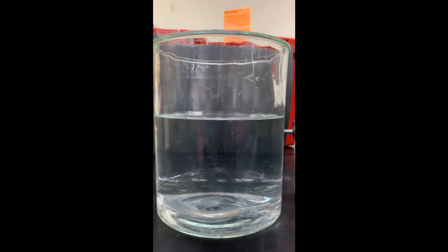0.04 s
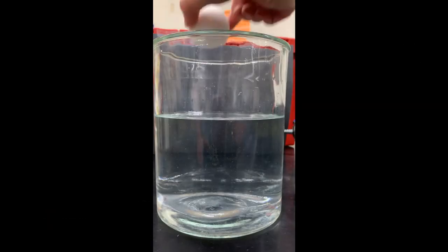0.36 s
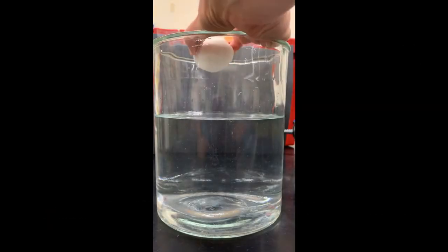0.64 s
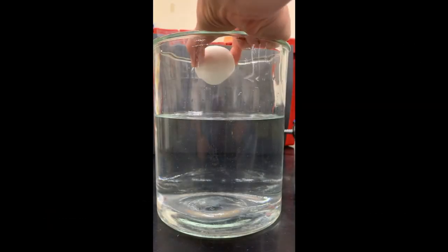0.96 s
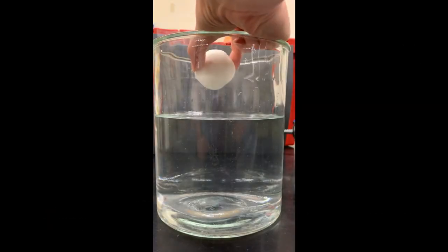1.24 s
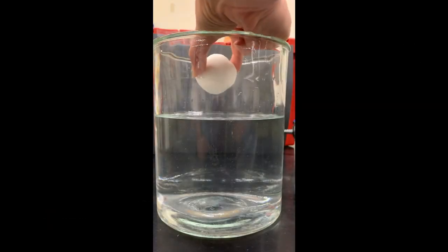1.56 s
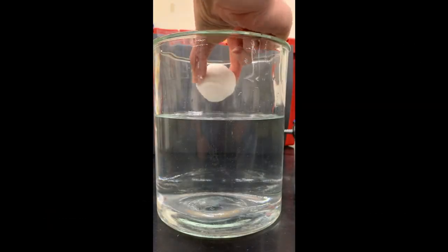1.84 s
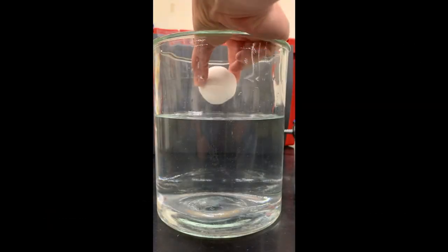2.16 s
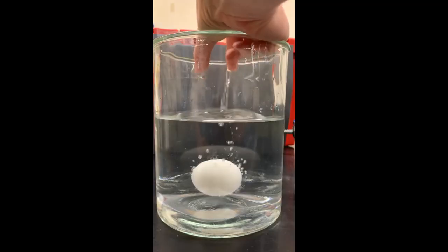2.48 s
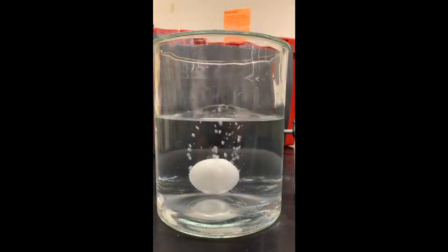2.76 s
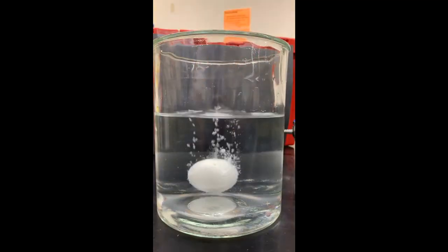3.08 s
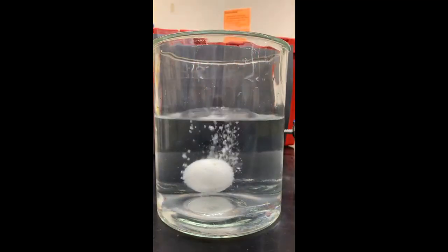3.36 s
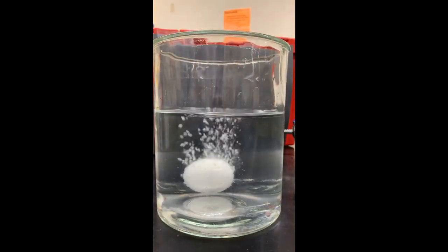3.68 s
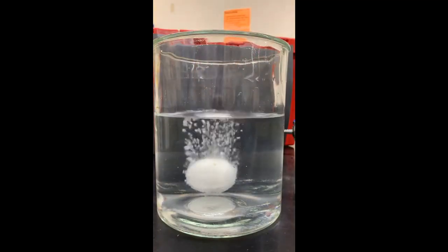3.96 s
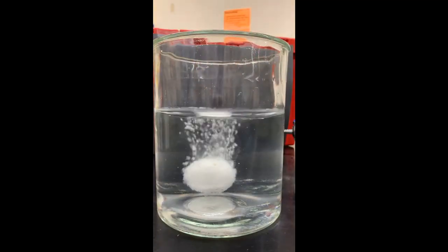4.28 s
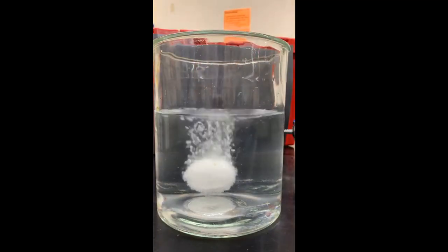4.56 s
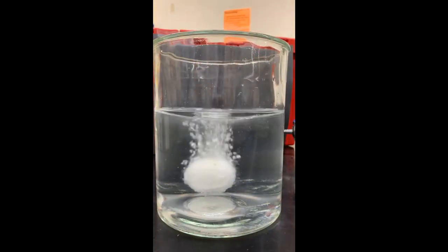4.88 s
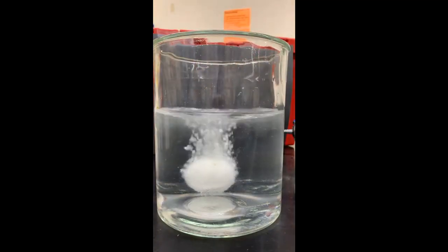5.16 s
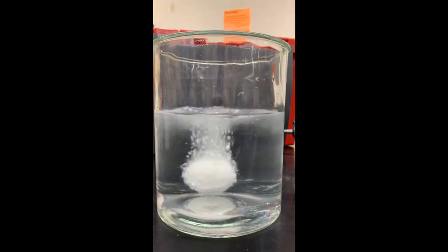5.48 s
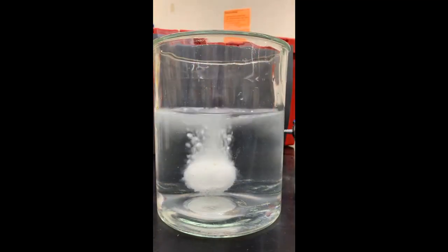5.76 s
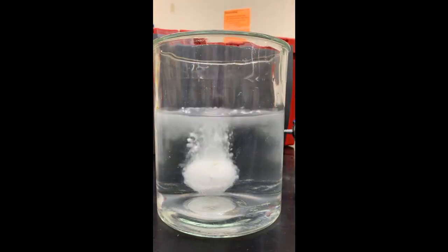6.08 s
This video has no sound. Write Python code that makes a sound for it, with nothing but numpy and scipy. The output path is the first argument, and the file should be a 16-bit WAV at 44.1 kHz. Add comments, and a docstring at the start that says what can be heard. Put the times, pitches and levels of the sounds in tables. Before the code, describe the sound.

A low ventilation hum fills a quiet room throughout. A hand brushes faintly past, with a soft bump on the bench at about 0.6 seconds and a light fingernail tap on glass at 1.6. At 2.4 seconds a small bath bomb drops into a nearby glass jar of water: a short splash and a hollow, plopping knock, the loudest moment, followed by a brief gurgle. Droplets click on the water around 2.6 seconds, and at 3 seconds the ball touches the glass again with a lighter clink. A few small drips and pops follow. From about 3.5 seconds a faint, high fizz builds, with light glass ticks and a tiny hissing spurt of gas near 3.8. The fizz continues, dotted with small snaps and bubble chirps. A soft bump and click come at 5.7 seconds, and a brief hand brush ends it just after 6.

```python
"""A small bath bomb drops into a tall glass jar of water: the impacts excite the normal modes of the
jar, its wall and the surface, and trapped bubbles ring as oscillators of gas and water. The ball touches
the glass once more, then fizzes: tiny gas bubbles burst at the surface, with a louder tick now and then.
Behind it are a hand brushing past, soft bumps on the bench and a quiet room with humming ventilation."""
import sys
import numpy as np
from scipy import signal
from scipy.fft import rfft, irfft
from scipy.io import wavfile

SR = 44100
rng = np.random.default_rng(int(sys.argv[2]) if len(sys.argv) > 2 else 0)


def unload_wav(signal):
    """Save mono or channel-first audio to the path in sys.argv[1] as 16-bit WAV at rate SR, clipped to [-1, 1]."""
    wavfile.write(
        sys.argv[1],
        SR,
        np.round(np.clip(np.atleast_2d(signal).T, -1, 1) * 32767).astype(np.int16),
    )


N = 270333
TIME = np.arange(N) / SR
FREQS = np.maximum(np.fft.rfftfreq(N, 1 / SR), 1)
CUTOFF_HZ = 15900
SIDES = np.array([[1], [-1]])   # sign of a level offset: left, right


# Blows of the ball: (time [s], body level [dB], glass level [dB], contact cut-off [Hz],
# spray level [dB], place [0 middle of the base, 1 near the wall])
BALL_BLOWS = [(2.374, -16, -35, 820, -36, 0), (2.4088, 1, -15.5, 6000, -44.5, 0),
              (2.9827, -18.5, -15.5, 720, -58, 0.97)]
# Modes of the jar with its water and air column: (frequency [Hz], level [dB], T60 [s])
JAR_MODES = [(70, -30, 0.17), (178, -41, 0.08), (333.3, -7, 0.038), (372, -24, 0.3), (450.3, -25.5, 0.19),
             (481.5, -10, 0.067), (664, -6, 0.027), (637, -21, 0.098), (713, -38.5, 0.43),
             (966, -18, 0.046), (1044, -13, 0.064), (1119, -12.5, 0.048), (1257, -31, 0.13),
             (1550, -17.5, 0.019), (1860, -35, 0.086), (2156, -26.5, 0.049), (2190, -50.5, 0.33),
             (2600, -27.5, 0.032)]
def ball(spray_rise_s=0.0057, spray_t60=0.058, body_top_hz=3100):
    """Impact excitation: each blow rings the jar and throws spray; soft contact spares high body modes."""
    body = glass = spray = 0
    hiss = band(rng.standard_normal(N), 1200, "high")
    for s, body_db, glass_db, contact_hz, spray_db, place in BALL_BLOWS:
        for hz, db, t60 in JAR_MODES:
            softening = np.hypot(1, (hz / contact_hz) ** 3)
            body += from_db(body_db + db) / softening * ring(s, hz, t60, rise_cycles=1)
        glass += from_db(glass_db) * glass_wall(s, place)
        spray += from_db(spray_db) * hiss * swell(age(s - spray_rise_s), spray_rise_s, spray_t60)
    return band(body, body_top_hz, "low", order=4) + glass + spray


# Glass modes: (frequency [Hz], level struck mid-base [dB], level struck near the wall [dB], T60 [s])
GLASS_MODES = [(1443, -38, -17, 0.039), (1535, -37, -22.5, 0.016), (2230, -48, -40, 0.096),
               (2345, -37, -24.5, 0.055), (3334, -38, -38, 0.19), (3420, -43, -24, 0.075),
               (4000, -45, -40, 0.049), (5500, -26.5, -61, 0.063), (6580, -39, -42, 0.047),
               (7260, -33, -47, 0.098), (9000, -49, -32, .03), (10150, -38, -43, 0.044),
               (10700, -45, -47, .035), (15300, -46, -48, .025)]
def glass_wall(s, place):
    """Modal superposition: the point of impact sets the strength of each mode of the glass."""
    return sum(from_db((1 - place) * middle_db + place * wall_db) * ring(s, hz, t60, rise_cycles=0.31)
               for hz, middle_db, wall_db, t60 in GLASS_MODES)


# The surface tears, then closes over the ball: (peak time [s], level [dB], 20 dB rise [s], 20 dB fall [s])
SPLASH_SURGES = [(2.379, -30.5, 0.015, 0.037), (2.41, -27.5, 0.014, 0.023)]
# Spectral shaping of the torn water: (frequency [Hz], gain [dB])
SPLASH_SPECTRUM = [(150, 28.5), (500, -0.5), (1100, -4.5), (1800, -9), (3000, -12), (4400, -12),
                   (7000, -10), (8500, -24), (11000, -21.5), (15000, -15)]
def plunge(froth_db=-22, froth_fall_s=0.085):
    """Air entrainment: torn water holds short-lived bubbles of every size, and their froth lingers."""
    swarm = grains(per_s=9000, spread_db=3, low_hz=250, high_hz=15000, t60_cycles=7)
    swarm = rms_one(coloured(band(swarm, 1800, "high", order=1), SPLASH_SPECTRUM))
    splashes = [from_db(db) * (surge(s, rise, fall) + from_db(froth_db) * surge(s, rise, froth_fall_s))
                for s, db, rise, fall in SPLASH_SURGES]
    return np.max(splashes, axis=0) * swarm


# Slaps and drips on the water: (time [s], level [dB], spectral tilt [dB/octave])
SURFACE_HITS = [(2.373, -26.5, 4.5), (2.6039, -31, -11), (2.6472, -29, -5), (3.128, -46.5, -23),
                (3.155, -49, -19), (3.32, -44.5, -13), (3.376, -51, -6)]
# Modes of the jar when the water is struck: (frequency [Hz], level [dB], T60 [s])
SURFACE_MODES = [(1535, 3, 0.022), (2346, -9.5, 0.034), (2700, -15, .015), (4170, 0, 0.01),
                 (5080, -8, 0.015), (6340, -14, 0.02), (8320, -18, 0.01)]
def drips():
    """Impulse response: every slap or drip rings the same modes; a sharper one favours the high ones."""
    lowest_hz = SURFACE_MODES[0][0]
    return sum(from_db(db + mode_db + tilt * np.log2(hz / lowest_hz)) * ring(s, hz, t60, rise_cycles=2)
               for s, db, tilt in SURFACE_HITS for hz, mode_db, t60 in SURFACE_MODES)


# Short ringing tones, bubble notes and low echoes after the knocks:
# (time [s], frequency [Hz], level [dB], T60 [s])
SHORT_TONES = [(2.3357, 4100, -46, 0.017), (2.3755, 623, -29, 0.082), (2.4315, 470, -35, 0.044),
               (2.439, 1060, -24, 0.016), (2.451, 1416, -37.5, 0.32), (2.461, 395, -25.5, 0.055),
               (2.498, 386, -15.5, 0.056), (2.524, 366, -28, .06), (2.6065, 1514, -32, 0.046),
               (2.6504, 1043, -33.5, 0.21), (2.728, 1038, -51, 0.16), (2.984, 548, -43.5, 0.23),
               (3.008, 423, -33, 0.043), (3.035, 354, -35.5, 0.16), (3.04, 552, -40, 0.078),
               (4.835, 1544, -59.5, .12), (5.072, 2110, -57, 0.069)]
def ringing_tones(wobble_db=2.1):
    """Damped resonance: each bubble note or low echo dips to its pitch, wavers and climbs slightly."""
    rings = sum(from_db(db) * ring(s, hz, t60, rise_cycles=1.94, glide=0.0068, sag=0.053)
                for s, hz, db, t60 in SHORT_TONES)
    return rings * from_db(wobble_db * drift(60))


def churn(start_s=2.42, db=-38, t60=0.12):
    """Cavity collapse: the hollow behind the ball breaks up into a short gurgle of bubbles."""
    swarm = grains(per_s=260, spread_db=2, low_hz=400, high_hz=1700, t60_cycles=35,
                   favour=lambda hz: 1 / np.sqrt(hz))
    return from_db(db) * swell(age(start_s), 0.01, t60) * swarm


# Spectral shaping of the cloud of tiny bubbles: (frequency [Hz], gain [dB])
FIZZ_SPECTRUM = [(1600, -22), (2300, 0.5), (3200, 1), (4200, 2), (4850, 8), (5400, -2), (6000, -4),
                 (6400, -2.5), (7300, -8.5), (8400, -8), (9500, -4.5), (11000, -4.5), (15000, -5.5)]
def fizz(wet_s=2.7, trickle_db=-90.5, stream_db=-87, waver_db=-1.5):
    """Shot noise: a cloud of tiny bubbles and separate snaps follow the gas flow, trickle to stream."""
    cloud = grains(per_s=8000, spread_db=2.2, low_hz=1500, high_hz=15500, t60_cycles=9)
    cloud = coloured(band(cloud, 10800, "high", order=1), FIZZ_SPECTRUM)
    cloud = rms_one(band(cloud, 1700, "high"))
    snaps = grains(per_s=30, spread_db=2.8, low_hz=4500, high_hz=15000, t60_cycles=22, favour=np.sqrt)
    flow = from_db(trickle_db) * (TIME > wet_s) + from_db(stream_db) * plume()
    return flow * from_db(waver_db * drift(8.2)) * (from_db(10) * cloud + from_db(1) * snaps)


def plume(arrival_s=3.64, build_s=0.17):
    """Buoyant rise: the share of the gas stream that has reached the surface, 0 to 1."""
    return 0.5 + 0.5 * np.tanh((TIME - arrival_s) / build_s)


# Brief bright ticks of a fingernail tap, the slap on the water, droplets and tiny bursts:
# (time [s], level [dB], lower band edge [Hz], upper band edge [Hz])
BRIGHT_TICKS = [(1.5645, -57, 3600, 12800), (2.262, -59, 6040, 14500), (2.374, -36, 4200, 15000),
                (2.3755, -33, 4200, 10000), (2.6044, -47, 4160, 13000), (2.628, -55, 6500, 13000),
                (2.648, -35.5, 3970, 10700), (2.6972, -42, 5000, 10400), (2.716, -58, 2520, 14600),
                (3.219, -53, 4200, 13800), (3.237, -49, 4260, 14000), (3.356, -49, 3780, 13800),
                (4.369, -64, 7900, 15500), (4.417, -57, 9000, 12000), (4.4365, -55, 12000, 15500),
                (4.4576, -57, 11000, 15000), (4.6112, -55, 8000, 14000), (4.713, -54, 12500, 15250),
                (4.9315, -54, 12100, 15500), (5.042, -60, 11000, 15500), (5.0625, -57, 9000, 11500),
                (5.2305, -54, 12000, 15000), (5.4937, -55, 10000, 15300), (5.584, -56, 5500, 14000),
                (5.824, -54, 9000, 15000), (5.953, -67, 10000, 14500)]
def ticks(gain_db=1, rise_s=0.00099, t60=0.0087):
    """Broadband transients: a brief tap, slap or burst spreads its energy over a wide treble band."""
    out, t = np.zeros(N + SR), TIME[:SR // 20]
    for s, db, low_hz, high_hz in BRIGHT_TICKS:
        crack = rms_one(band(rng.standard_normal(len(t)), [low_hz, high_hz], "band"))
        first = int(s * SR)
        out[first:first + len(t)] += from_db(db + gain_db) * swell(t, rise_s, t60) * crack
    return out[:N]


# Snaps of larger bubbles and of dry fingers: (time [s], level [dB], centre frequency [Hz])
DULL_SNAPS = [(1.562, -45, 2000), (1.724, -59, 4000), (2.114, -51, 2840), (3.219, -46.5, 2800),
              (3.237, -44.5, 2560), (3.672, -42.5, 2700), (3.762, -41, 2960), (4.059, -47.5, 2920),
              (4.485, -45, 2300), (4.508, -49.5, 2550), (4.647, -54, 2870), (5.6633, -35, 2380)]
def pops(rise_s=0.001, t60=0.014, edge_ratio=1.5):
    """Band-limited transients: each dull snap is a burst of noise around a pitch of its own."""
    noise, out = rng.standard_normal(N), 0
    for s, db, hz in DULL_SNAPS:
        snap = rms_one(band(noise, [hz / edge_ratio, hz * edge_ratio], "band"))
        out += from_db(db) * snap * swell(age(s), rise_s, t60)
    return out


# Tiny bubbles opening at the surface: (time [s], starting frequency [Hz], level [dB])
OPENING_BUBBLES = [(4.368, 4400, -57), (5.156, 5640, -52.5), (5.374, 4650, -59), (5.548, 3860, -51),
                   (5.752, 6170, -56), (5.782, 4000, -49), (5.878, 12100, -57), (5.918, 5900, -45.5),
                   (5.965, 6200, -53.5), (6.0, 3620, -51), (6.045, 11500, -59)]
def chirps():
    """Resonance rises as size falls: an opening bubble shrinks, so its note shoots upward."""
    return sum(from_db(db) * ring(s, hz, t60=0.016, rise_cycles=9.4, glide=0.21)
               for s, hz, db in OPENING_BUBBLES)


# Swarms under the surface: (peak time [s], level [dB], typical frequency [Hz], Gaussian half length [s])
BUBBLE_SWARMS = [(2.905, -68, 1840, 0.25), (3.197, -69.5, 1500, 0.34), (3.786, -67, 1930, 0.23),
                 (4.037, -63.5, 1570, 0.036), (4.26, -69, 3500, 0.092), (4.87, -83, 1650, 0.04),
                 (5.104, -70.5, 2100, 0.24)]
def gurgle(stray_db=-83, stray_hz=3130, width_octaves=0.75):
    """Bubble resonance: larger bubbles rise in swarms of like size; each swarm pulls the pitch toward its own,
    the louder ones harder."""
    gains = [from_db(db) * bell(s, half) for s, db, _, half in BUBBLE_SWARMS]
    gains.append(from_db(stray_db) * plume())   # stray bubbles between the swarms
    pitches = [hz for _, _, hz, _ in BUBBLE_SWARMS] + [stray_hz]
    power = np.square(gains) + 1e-18
    centre = np.log2(pitches) @ power / power.sum(0)
    large = grains(per_s=550, spread_db=1.7, low_hz=1350, high_hz=4000, t60_cycles=45,
                   favour=lambda hz: np.sqrt(hz) / (1 + ((np.log2(hz) - centre) / width_octaves) ** 2))
    return np.sqrt(power.max(0)) * large


# Spurts of gas from a pore: (middle time [s], half length [s], level [dB])
GAS_SPURTS = [(3.816, 0.038, -59), (3.945, 0.012, -64)]
# Whistles of the pore: (frequency [Hz], bandwidth [Hz], level [dB])
PORE_WHISTLES = [(6980, 290, -15), (10700, 350, -21), (13600, 250, -17), (15280, 150, -9)]
def squeal(hiss_db=-13, sputter_db=2):
    """Jet noise: gas forced through a narrow pore hisses and whistles for a moment."""
    jet = rng.standard_normal(N)
    whistles = sum(from_db(db) * rms_one(band(jet, [hz - width / 2, hz + width / 2], "band"))
                   for hz, width, db in PORE_WHISTLES)
    hiss = from_db(hiss_db) * band(jet, 3000, "high")
    spurts = sum(from_db(db) / (1 + ((TIME - s) / half) ** 6) for s, half, db in GAS_SPURTS)
    return spurts * from_db(sputter_db * drift(40)) * (whistles + hiss)


# Modes of the jar driven by the foam: (frequency [Hz], level [dB], T60 [s])
FOAM_MODES = [(1553, -21, 0.034), (2146, 1, 0.035), (2270, -3, 0.052)]
def simmer(bursts_per_s=900, dome_s=5.17, dome_db=-80, steady_db=-81):
    """Random excitation: small bursts keep the jar ringing, swelling as the plume domes the surface."""
    bursts = rng.standard_normal(N) * (rng.random(N) < bursts_per_s / SR)
    jar = sum(from_db(db) * ring(0, hz, t60, rise_cycles=1) for hz, db, t60 in FOAM_MODES)[:SR // 4]
    level = from_db(dome_db) * bell(dome_s, half_s=0.21) + from_db(steady_db) * plume()
    return level * rms_one(signal.fftconvolve(bursts, jar)[:N])


# Knocks of grains and fingertips on the glass: (time [s], level [dB])
GLASS_KNOCKS = [(1.5645, -32), (3.673, -31), (3.763, -25), (3.986, -32), (5.664, -27.5)]
def taps(top_hz=2070):
    """Impulse response: a light knock wakes mainly the low modes of the glass."""
    knocks = np.zeros(N)
    for s, db in GLASS_KNOCKS:
        knocks[int(s * SR)] = from_db(db)
    glass = glass_wall(0, place=0.86)[:SR // 4]
    return band(signal.fftconvolve(knocks, glass)[:N], top_hz, "low")


# Soft bumps on the bench: (time [s], frequency [Hz], level [dB], T60 [s])
BENCH_BUMPS = [(0.596, 189.4, -33, 0.11), (0.609, 70, -40.5, 0.29), (0.67, 356, -26, 0.011),
               (2.6, 228, -39, 0.045), (5.649, 125, -21, 0.02), (5.647, 360, -28.5, 0.021)]
# Hand strokes: (peak time [s], level [dB], 20 dB rise [s], 20 dB fall [s], relative hiss level [dB])
HAND_STROKES = [(.06, -64, 0.23, 0.21, -13), (.29, -67, 0.52, 0.24, -46), (.72, -79.5, 0.64, 0.35, 0.5),
                (1.77, -73.5, 0.24, 0.64, -8), (5.652, -51, 0.043, 0.096, -35),
                (6.13, -46.5, 0.024, .1, -38)]
# Spectral shaping of the brushing: (frequency [Hz], gain [dB])
BRUSH_SPECTRUM = [(500, 3.5), (1400, -2), (3000, -0.5), (4500, -3.5), (7000, -12), (15000, -31)]
def handling(hiss_low_hz=7000):
    """Friction noise and damped vibration: a hand brushes past, dry fingers hiss, the bench is bumped."""
    bumps = sum(from_db(db) * ring(s, hz, t60, rise_cycles=0.67) for s, hz, db, t60 in BENCH_BUMPS)
    friction = rng.standard_normal(N) * from_db(1.4 * drift(180))
    brush = band(rms_one(coloured(friction, BRUSH_SPECTRUM)), 430, "high")
    hiss = rms_one(band(friction, hiss_low_hz, "high"))
    strokes = np.array([from_db(db) * surge(s, rise, fall) for s, db, rise, fall, _ in HAND_STROKES])
    hiss_shares = from_db([hiss_db for *_, hiss_db in HAND_STROKES])
    return bumps + strokes.max(0) * brush + hiss_shares @ strokes * hiss


# Rush of the ventilation: (frequency [Hz], spectral level [dB])
AIR_SPECTRUM = [(28, -66), (50, -74), (90, -86), (150, -80.5), (210, -73.5), (290, -80.5), (400, -74),
                (680, -92), (1100, -91), (1700, -94.5), (2600, -104.4), (4200, -114.1), (8000, -124.7),
                (15000, -130.9)]
# Colouring by the air in the jar: (frequency [Hz], bandwidth [Hz], gain [dB])
CAVITY_RESONANCES = [(352, 20, 4), (657, 25, 6), (727, 32, 3), (814, 31, 5.5), (955, 32, 4.5),
                     (1052, 45, 6), (1213, 47, 2.5), (1426, 29, -3), (2260, 79, 2)]
# Mains and fan tones: (frequency [Hz], level [dB])
HUM_TONES = [(120, -55), (178.7, -59.5), (229.7, -61.5), (66, -88.5)]
def ventilation(air_db=-1.75, waver=0.41, wander_rad=0.68):
    """Broadband and tonal noise: rushing air, coloured by the jar's cavity resonances, and a hum."""
    hollow_db = sum(db / (1 + (2 * (FREQS - hz) / width) ** 2) for hz, width, db in CAVITY_RESONANCES)
    air = irfft(rfft(diffuse(N)) * from_db(hollow_db), N)
    air = coloured(air, AIR_SPECTRUM) * np.sqrt(SR / 2) * from_db(air_db)
    hum = 0
    for hz, db in HUM_TONES:
        amplitude = from_db(db) * np.sqrt(2) * (1 + waver * drift(20.4))
        hum += amplitude * np.sin(2 * np.pi * hz * TIME + wander_rad * drift(5.8))
    return band(air + hum, 46, "high") * from_db(0.5 * SIDES)


# Reverberation time of the room: (frequency [Hz], T60 [s])
ROOM_DECAY = [(100, 1), (400, 0.64), (1200, 0.31), (4000, 0.25), (12000, 0.05)]
def room(x, build_s=0.0032, wall_hz=3000):
    """Reverberation: a diffuse echo dies octave by octave, the treble first."""
    t, tail = TIME[:SR], 0
    noise = rfft(diffuse(SR, width=1.16))
    octave = np.log2(np.clip(np.arange(noise.shape[1]), 64, 16384))
    bench = 4.15 * swell(t, build_s, 0.099)   # dense early echoes from the bench and nearby things
    for k in range(6, 15):
        part = irfft(noise * np.maximum(1 - np.abs(octave - k), 0), SR)
        tail += part * (swell(t, build_s, at_hz(ROOM_DECAY, 2 ** k)) + bench)
    tail = band(rms_one(tail) / np.sqrt(SR), wall_hz, "low", order=1)
    return signal.fftconvolve(x[None], tail, axes=1)[:, :N]


# Coherence of the diffuse field: (frequency [Hz], left-right correlation [-1 to 1])
FIELD_COHERENCE = [(60, 1), (130, 0.97), (290, 0.87), (640, 0.22), (1400, 0.3), (2200, -0.37),
                   (3100, -0.61), (5000, -0.64)]
def diffuse(size, width=1):
    """Spatial coherence: noise from all sides is alike at two close points in the bass, less so above."""
    mid, side = rfft(rng.standard_normal((2, size)))
    alike = np.clip(at_hz(FIELD_COHERENCE, 1 + width * np.fft.rfftfreq(size, 1 / SR)), -1, 1)
    return irfft(np.sqrt(1 + alike) * mid + np.sqrt(1 - alike) * side * SIDES, size) / np.sqrt(2)


def ring(start, hz, t60, rise_cycles, glide=0, sag=0, sag_s=0.0022):
    """Damped oscillator: it may start sharp by the share sag and settle, and glide upward as it dies."""
    out, first = np.zeros(N), int(start * SR)
    t = np.maximum(TIME[first:first + int(min(2 * t60, 1) * SR)] - start, 0)
    gliding = t * (1 + glide * np.minimum(t / t60, 2))
    settling = sag * sag_s * (1 - np.exp(-t / sag_s))
    tone = np.sin(2 * np.pi * hz * (gliding + settling))
    out[first:first + len(t)] = swell(t, rise_cycles / hz, t60) * tone
    return out


def grains(per_s, spread_db, low_hz, high_hz, t60_cycles, count=24, favour=None):
    """Poisson process: bubbles of random strength ring a bank of resonators, weighted by favour(hz)."""
    sizes = from_db(spread_db * np.minimum(rng.exponential(1, N), 5)) * rng.choice([-1, 1], N)
    clicks = sizes * (rng.random(N) < per_s / SR)
    resonator, out = rng.integers(0, count, N), 0
    for k, hz in enumerate(np.geomspace(low_hz, high_hz, count)):
        radius, angle = np.exp(-np.log(1000) * hz / (t60_cycles * SR)), 2 * np.pi * hz / SR
        drive = clicks * (resonator == k) * (favour(hz) if favour else 1)
        out += signal.lfilter([1, 0, -1], [1, -2 * radius * np.cos(angle), radius ** 2], drive + 1e-18)
    return rms_one(out)


def swell(t, rise, t60):
    """Exponential build-up and decay."""
    return (1 - np.exp(-t / rise)) * np.exp(-np.minimum(np.log(1000) * t / t60, 20))


def surge(s, rise_s, fall_s):
    """Exponential envelope that peaks at s, gaining 20 dB over rise_s and losing 20 dB over fall_s."""
    return 10 ** -np.minimum(np.maximum((s - TIME) / rise_s, (TIME - s) / fall_s), 10)


def bell(s, half_s):
    """Gaussian envelope that peaks at s."""
    return np.exp(-0.5 * ((TIME - s) / half_s) ** 2)


def age(start):
    """Seconds since an event, zero before it."""
    return np.maximum(TIME - start, 0)


def drift(rate_hz):
    """Random modulation: low-passed noise of unit power."""
    return rms_one(irfft(rfft(rng.standard_normal(N)) / (1 + (FREQS / rate_hz) ** 2), N))


def band(x, hz, kind, order=2):
    """Causal Butterworth filter."""
    return signal.sosfilt(signal.butter(order, hz, kind, fs=SR, output="sos"), x + 1e-18)


def coloured(x, spectrum):
    """Zero-phase filter with the gains of a table."""
    return irfft(rfft(x) * from_db(at_hz(spectrum, FREQS)), N)


def at_hz(points, hz):
    """Interpolation of a table on a log-frequency axis."""
    frequencies, values = np.transpose(points)
    return np.interp(np.log(hz), np.log(frequencies), values)


def rms_one(x):
    """Normalisation to unit power."""
    return x / np.sqrt(np.mean(x ** 2) + 1e-20)


def from_db(db):
    """Decibels to amplitude ratio."""
    return 10 ** (np.asarray(db) / 20)


def scene():
    """Direct and reverberant sound: the jar is close; the room answers least to what rings in water."""
    drop = ball() + plunge()
    water = drips() + ringing_tones() + churn()
    small = ticks() + chirps() + taps() + pops() + handling() + fizz() + gurgle() + simmer() + squeal()
    echo = room(from_db(-4.5) * drop + from_db(-7.0) * water + from_db(-1.0) * small)
    return drop + water * from_db(1.0 * SIDES) + small * from_db(0.27 * SIDES) + echo + ventilation()


def record(dry, merge_hz=3500, lag_from_hz=2790, lag_s=0.000237):
    """Group delay: the treble narrows to one signal that reaches the right side late; the top is cut."""
    left, right = rfft(dry)
    merge_angle = np.clip((FREQS - merge_hz) / 1100, 0, 1) * np.pi / 2
    right = np.cos(merge_angle) * right + np.sin(merge_angle) * left
    right *= np.exp(-2j * np.pi * np.maximum(FREQS - lag_from_hz, 0) * lag_s)
    low_pass = 1 / np.sqrt(1 + (FREQS / CUTOFF_HZ) ** 120)
    return irfft(np.array([left, right]) * low_pass, N)


dry = scene()
out = record(dry)
unload_wav(out)
```